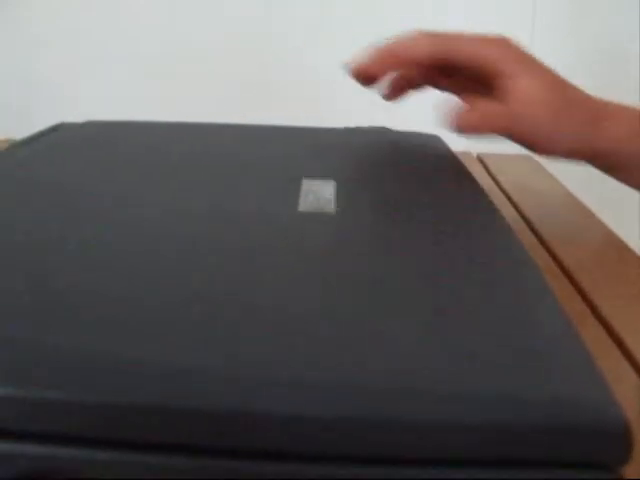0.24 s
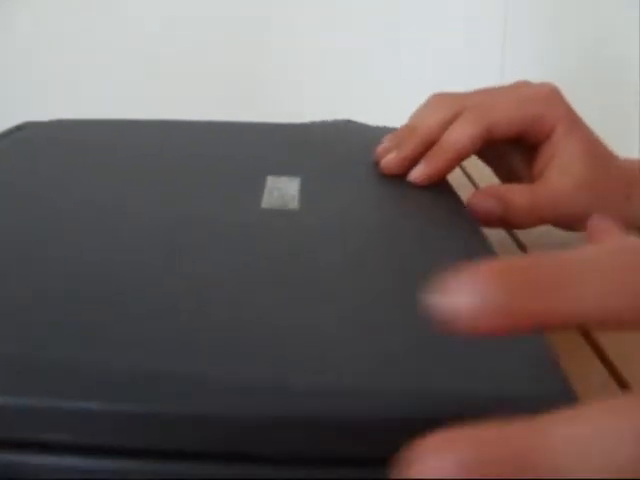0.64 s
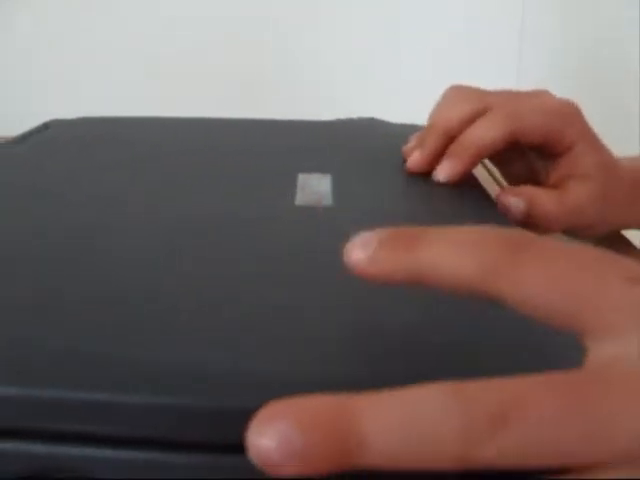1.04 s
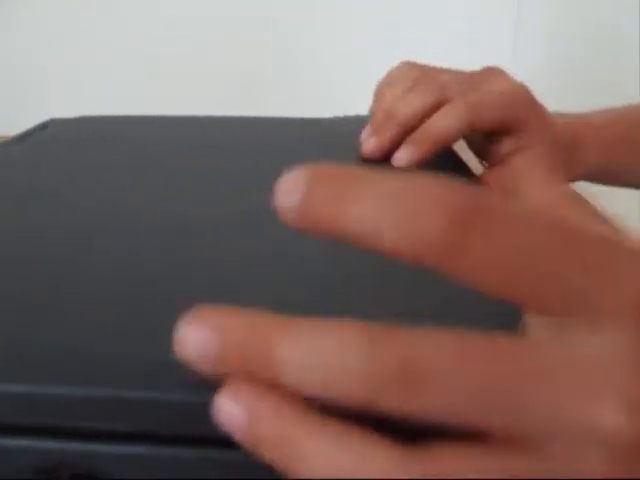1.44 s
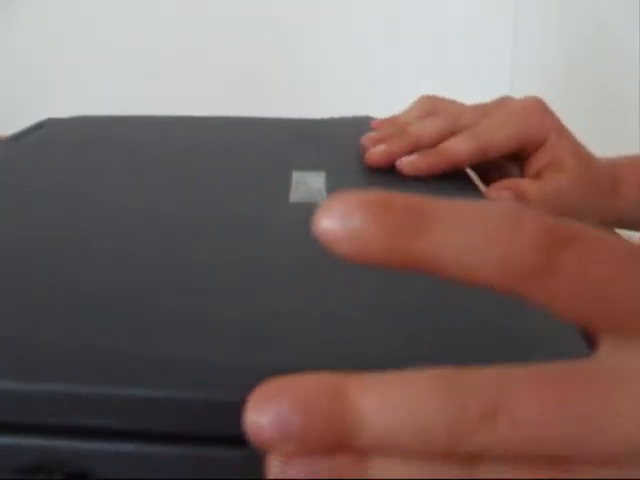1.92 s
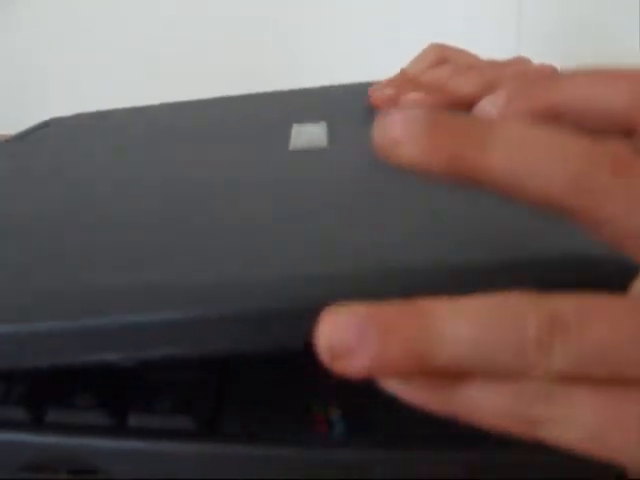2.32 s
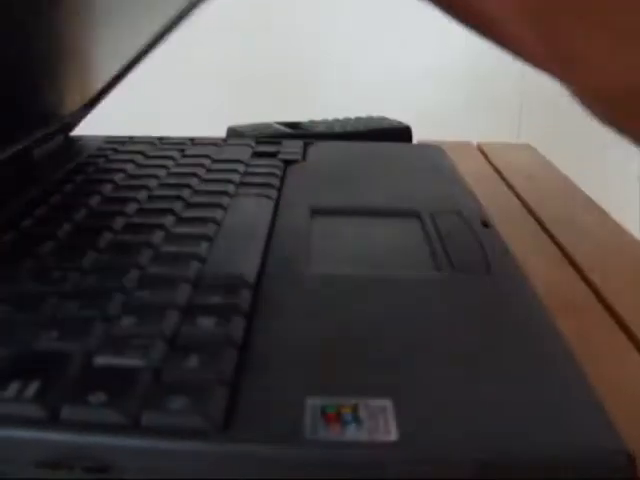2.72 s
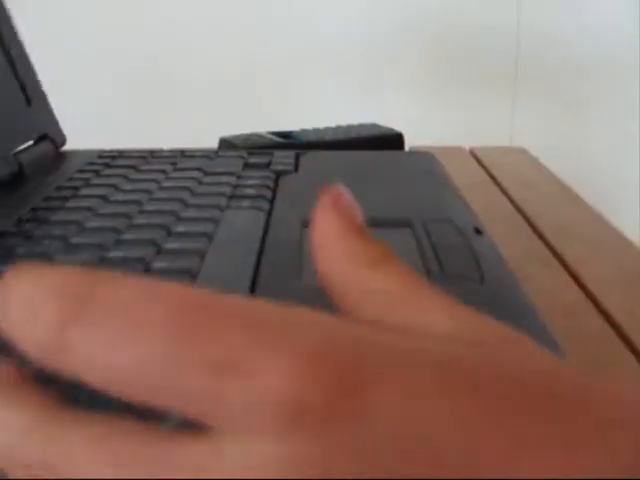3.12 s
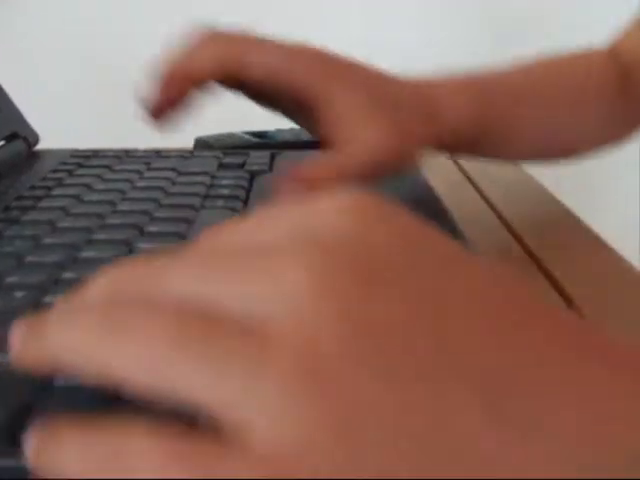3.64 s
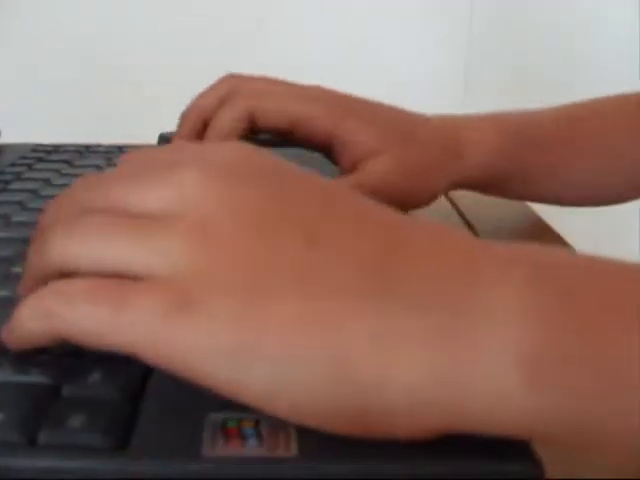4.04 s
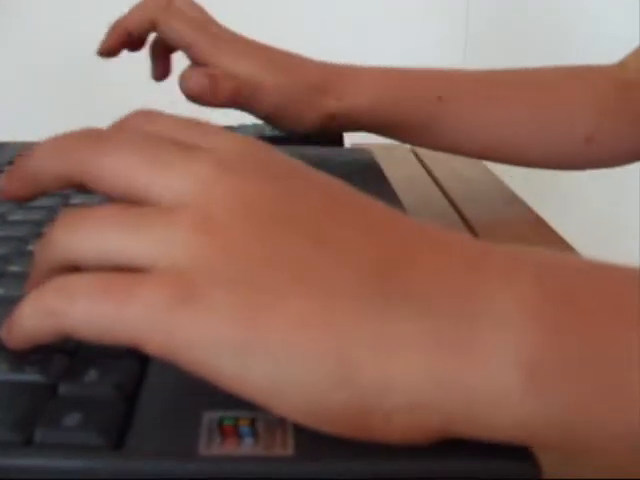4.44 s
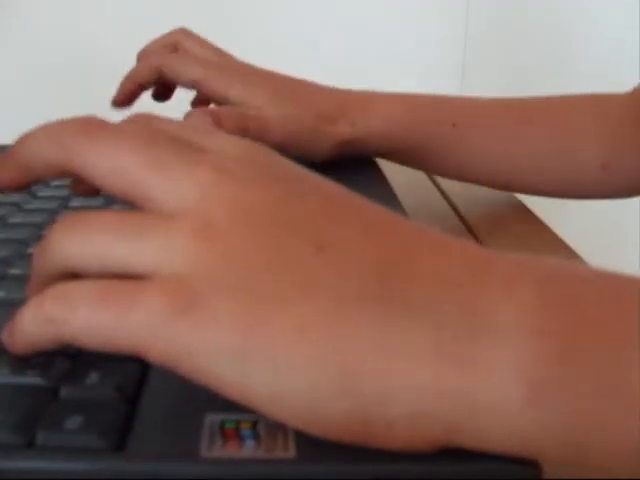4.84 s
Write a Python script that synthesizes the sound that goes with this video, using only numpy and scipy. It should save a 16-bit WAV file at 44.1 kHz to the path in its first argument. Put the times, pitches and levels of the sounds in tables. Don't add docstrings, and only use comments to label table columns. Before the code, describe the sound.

Close view of an old laptop on a wooden desk, in mono with soft hiss. A harsh two-part plastic crack opens, its echo fading over most of a second. Sparse fingertip ticks and brief skin rubs follow, with a sharp latch snap, quieter opening clicks, a pair of firmer taps after three seconds, then two separate key clicks. Occasional muffled knocks arrive from far away.

```python
import sys
import numpy as np
from scipy import signal
from scipy.fft import rfft, irfft, next_fast_len
from scipy.io import wavfile
from scipy.ndimage import uniform_filter1d, map_coordinates

SR = 44100
rng = np.random.default_rng(int(sys.argv[2]) if len(sys.argv) > 2 else 0)


def output_pcm(signal):
    pcm = np.clip(np.atleast_2d(signal).T, -1, 1) * 32767
    wavfile.write(sys.argv[1], SR, np.round(pcm).astype(np.int16))


def gain_from_db(level_db):
    decades = np.asarray(level_db, float) / 20
    return 10 ** decades


N = 224184

# pitch_hz, t60_s (time to fall 60 dB)
ROOM_RINGING = [(150, 0.55), (600, 0.88), (1200, 0.8), (3000, 1), (7500, 0.96)]

# pitch_hz, level_db
HISS_TONE = [(12, -53), (20, -5.5), (27, -6), (97, -13), (305, -9), (329, -10.5), (444, -10.5), (543, -9),
             (830, -9.5), (1070, -12), (1270, -11.5), (1940, -13), (7880, -16), (10200, -23), (17300, -120)]
HISS_DB = -49
HUM_HZ, HUM_WIDTH_HZ, HUM_DB = 100.6, 12.5, -63.5
OFFSET = -0.0034
TOP_HZ = 8010

# start_s, peak_db, centre_hz
KNOCKS = [
    (0.444, -27.5, 759),
    (0.485, -32.5, 795),
    (1.665, -28.5, 1250),
    (2.938, -19.5, 1470),
    (4.235, -25.5, 1490),
]
# pitch_hz, level_db
WALL_TONE = [(59, -43.5), (100, -13.5), (218, -11), (550, -5), (901, -0.5), (1180, -5.5), (1550, -8),
             (1680, -15.5), (2230, -18.5), (4500, -42), (5850, -70), (9900, -120)]
KNOCK_SWELL_S = 0.004

# start_s, strongest_s, end_s, level_db, brightness_db
RUBS = [(0.047, 0.041, 0.052, -30, 1.5), (.46, 0.496, 0.39, -42.5, -19.5), (1.177, 1.192, 1.235, -36.5, 2),
        (1.323, 1.339, 1.4, -39, -4), (1.882, 1.886, 1.905, -52.5, 12), (2.077, 2.097, 2.112, -48, 2),
        (2.449, 2.484, 2.7, -53, 7.5), (2.848, 2.859, 2.884, -42.5, 4), (3.464, 3.476, 3.6, -45.5, 1),
        (3.497, 3.524, 3.539, -43.5, -1), (4.707, 4.722, 4.745, -52.5, 10)]
# pitch_hz, width_hz, level_db
CASE = [(1700, 1060, 0), (4500, 3000, 6.5), (7250, 1500, 2.5)]
RUB_SWELL_DB, RUB_FADE_DB = 13, 15.5

# start_s, peak_db, ring_hz, t60_s
THUDS = [
    (0.0684, -16, 1241, 0.074),
    (0.429, -38, 101, 0.092),
    (0.48, -33.5, 2300, 0.024),
    (1.656, -42, 576, 0.045),
    (1.1845, -21.5, 6810, 0.033),
    (2.468, -40, 6660, 0.047),
    (2.914, -38.5, 98.5, 0.16),
    (3.222, -19, 1020, 0.014),
    (3.464, -33, 320, 0.02),
]
LATCH_S = 1.1885
# pitch_hz, level_db, t60_s
LATCH = [(81.5, -10, 0.0053), (366, -15, 0.0081), (653, -19, 0.012), (910, -14, 0.008), (1750, -13, 0.013),
         (6190, -8, 0.015)]
# start_s, peak_db, pitch_ratio
PRESSES = [
    (4.628, -30.5, 1.03),
    (5.077, -26, 1.34),
]
# pitch_hz, level_db, t60_s
DECK = [(212, -4.5, 0.068), (665, 1, 0.021), (1360, -7.5, 0.026)]

# start_s, peak_db, bright_ring_hz, body_db (re bright), body_ring_hz
SNAPS = [(0.9121, -14.5, 6250, -20.5, 1620), (1.188, -4.5, 4770, -9.5, 2490),
         (1.9209, -15.5, 6400, -20.5, 1200), (2.4892, -18.5, 6270, -5, 2810),
         (2.4909, -18.5, 6620, -6.5, 1490), (2.7053, -27.5, 5170, -0.5, 3040),
         (3.2211, -15, 3600, -8, 2250), (3.2246, -17, 4500, -6, 1750), (3.3958, -24.5, 3600, -1, 2740),
         (3.462, -26.5, 3970, -5, 2010), (3.6368, -29.5, 6950, -6.5, 1680),
         (4.6227, -17.5, 7250, -16.5, 1710), (4.626, -18.5, 5450, -18, 2010),
         (5.0735, -10.5, 5800, -8, 1750)]
SNAP_T60_S, LATCH_T60_S = 0.023, 0.015
REBOUND_S, REBOUND_DB, REBOUND_T60_S = 0.0056, -18, 0.026
REBOUND_HZ, REBOUND_BODY_DB = 5800, -4.5
FULL_BODY_DB = -14
ECHO_PURE_HZ, ECHO_PURE_DB = 650, 5
ECHO_BROAD_HZ, ECHO_BROAD_DB = 5500, 6
# start_s, peak_db, bright_ring_hz, body_db (re bright)
TOUCHES = [(0.481, -44, 3500, 12.5), (0.7236, -41, 7430, -5), (0.7924, -39.5, 4300, -4),
           (0.9524, -38, 6350, -16), (1.036, -40, 5160, -2.5), (1.3384, -30.5, 5100, -17),
           (1.3648, -41.5, 4800, -7.5), (1.461, -33.5, 4440, -8), (1.4879, -43.5, 5300, 3.5),
           (1.8796, -41.5, 6700, -1.5), (2.0041, -44, 5600, 1), (2.2508, -35, 6840, -11),
           (2.3504, -37.5, 6210, -2), (2.3784, -48.5, 5800, 7), (2.4122, -38, 5700, -13),
           (2.5206, -37.5, 3480, 0), (2.7794, -37.5, 6800, -7), (2.8664, -29.5, 3550, -5.5),
           (3.5103, -34.5, 4300, -17), (4.0214, -43.5, 6600, -22), (4.273, -42, 6500, -15),
           (2.733, -41, 6800, -15), (4.695, -38, 7170, -26), (4.72, -39, 5900, -9)]
TOUCH_BODY_HZ, TOUCH_T60_S = 1800, 0.019

# start_s, peak_db, thump_db (re peak), crack_t60_s
CLACK = [
    (0.053, 0, -17, 0.023),
    (0.066, 5.5, -29, 0.021),
]
# pitch_hz, level_db, t60_s
SHELL = [(690, -19.5, 0.29), (1221, 1, 0.069), (2300, 0, 0.068), (2940, -27, 0.11), (3500, -12, 0.077),
         (4170, -28, 0.37), (5082, -5.5, 0.083), (5800, 15.5, 0.087)]
# pitch_hz, level_db
CRACK_TONE = [(180, -68), (300, -22), (792, 3.5), (1190, -3), (2180, 4.5), (5090, -8), (5750, -7.5),
              (7880, -13.5), (10200, -59.5), (17300, -120)]
# pitch_hz, level_db
CLACK_ROOM_TONE = [(35, -77), (60, -49), (87, -13), (200, -1.5), (354, -9), (533, -21.5), (640, -8.5),
                   (724, -17.5), (1260, -4), (1710, -12.5), (2090, -5), (5800, -15.5), (7880, -22.5),
                   (10200, -64), (17300, -120)]
# pitch_hz, width_hz, level_db
CLACK_BANDS = [(630, 23, -12), (1240, 61, -2.5), (2024, 180, -0.5), (2630, 140, -2.5), (2910, 95, 0),
               (3260, 82, -5.5), (3470, 54, -2.5), (4300, 57, -9)]


def unit(x):
    return x / np.sqrt(np.mean(x ** 2) + 1e-20)


def peak(x):
    return x / np.abs(x).max()


def energy_one(x):
    return x / np.linalg.norm(x)


def along(points, hz):
    f, v = np.transpose(points)
    return np.interp(np.log(hz + 1), np.log(f + 1), v)


def filtered(x, response):
    m = next_fast_len(len(x) + 8192)
    hz = np.fft.rfftfreq(m, 1 / SR)
    return irfft(rfft(x, m) * response(hz), m)[:len(x)]


def rings(modes):
    def response(f):
        total = 0
        for k, (centre, width, db) in enumerate(modes):
            damping = 1j * f * width
            total = total + (-1) ** k * gain_from_db(db) * damping / (centre * centre - f * f + damping)
        return total
    return response


def twice(response):
    return lambda f: response(f) ** 2


def colour(tone):
    return lambda hz: gain_from_db(along(tone, hz))


def add(track, s, sound):
    part = track[round(s * SR):][:len(sound)]
    part += sound[:len(part)]


def tail(build_s, stretch=0.82):
    hz, t, z = signal.stft(rng.standard_normal(SR), SR, nperseg=256)
    t60 = stretch * along(ROOM_RINGING, hz)[:, None]
    decay = signal.istft(z * gain_from_db(-60 * t / t60), SR, nperseg=256)[1][:SR]
    swell = 1 - np.exp(-(np.arange(SR) / SR / build_s) ** 2.3)
    return energy_one(decay * swell)


def rattle(t60, snap, size=2600):
    t = np.arange(size) / SR
    lumps = rng.standard_normal(size // 30 + 4)
    lumps_db = 1.8 * map_coordinates(lumps, [np.arange(size) / 30], order=1)
    fade = gain_from_db(lumps_db - 60 * t / max(t60, 0.002)) * (1 - np.exp(-t / 0.00083))
    first = snap * np.exp(-((t - 0.0007) / 0.00004) ** 2)
    return rng.standard_normal(size) * fade + first


def floor():
    hiss = unit(filtered(rng.standard_normal(N), colour(HISS_TONE)))
    hum = unit(filtered(rng.standard_normal(N), rings([(HUM_HZ, HUM_WIDTH_HZ, 0)])))
    return gain_from_db(HISS_DB) * hiss + gain_from_db(HUM_DB) * hum


def knocks():
    out = np.zeros(N)
    for s, db, hz in KNOCKS:
        def walls(f):
            return colour(WALL_TONE)(f) * (1.86 + rings([(hz, 300, 0), (850, 200, -3)])(f))
        wet = filtered(tail(build_s=0.011, stretch=1.0), walls)
        add(out, s - 0.003, gain_from_db(db + 21.5) * energy_one(wet))
        blow = rattle(0.14, snap=0.3)
        blow = blow * (1 - np.exp(-np.arange(len(blow)) / SR / KNOCK_SWELL_S))
        add(out, s - 0.0035, gain_from_db(db - 2.0) * peak(filtered(blow, walls)))
    return out


def rubs():
    out, time = np.zeros(N), np.arange(N) / SR
    noise = rng.standard_normal(N)
    grip = unit(uniform_filter1d(rng.standard_normal(N), 120))
    grains = noise * gain_from_db(4 * grip)
    dull = unit(filtered(grains[::-1], rings(CASE[:1])))
    bright = unit(filtered(grains, rings(CASE[1:])))
    for start, top, end, db, bright_db in RUBS:
        edge = np.clip(np.minimum(time - start, end - time) / 0.0019, 0, 1)
        stroke_db = np.interp(time, [start, top, end], [db - RUB_SWELL_DB, db, db - RUB_FADE_DB])
        out += edge * gain_from_db(stroke_db - 0.5) * (dull + gain_from_db(bright_db) * bright)
    return out


def thuds():
    out, t = np.zeros(N), np.arange(SR // 4) / SR
    strikes = THUDS + [(LATCH_S, db, hz, t60) for hz, db, t60 in LATCH]
    for s, db, ratio in PRESSES:
        strikes += [(s, db + level, ratio * hz, t60) for hz, level, t60 in DECK]
    for s, db, hz, t60 in strikes:
        onset = 1 - np.exp(-t * hz * 3)
        add(out, s, gain_from_db(db - 60 * t / t60) * onset * np.sin(2 * np.pi * hz * t))
    return out


def contact(db, hz, body_db, body_hz, t60):
    ring = peak(filtered(rattle(t60, snap=10.0), twice(rings([(hz, 950, 0)]))))
    spray = peak(filtered(rattle(t60, snap=0.87), twice(rings([(5680, 5100, 0)]))))
    body = peak(filtered(rattle(t60, snap=2.55), rings([(body_hz, 700, 0), (2200, 2200, -8)])))
    late_body = np.roll(body, round(0.000986 * SR))
    return gain_from_db(db + 2.5) * (ring + gain_from_db(-2.5) * spray + gain_from_db(body_db + 1.0) * late_body)


def ticks():
    out = np.zeros(N)
    contacts = [(*touch, TOUCH_BODY_HZ, TOUCH_T60_S) for touch in TOUCHES]
    for s, db, hz, body_db, body_hz in SNAPS:
        t60 = LATCH_T60_S if abs(s - LATCH_S) < REBOUND_S else SNAP_T60_S
        contacts.append((s, db, hz, body_db, body_hz, t60))
        contacts.append((s + REBOUND_S, db + REBOUND_DB, REBOUND_HZ, REBOUND_BODY_DB, body_hz, REBOUND_T60_S))
    for s, *settings in contacts:
        add(out, s - 0.0003, contact(*settings))
    for s, db, hz, body_db, _ in SNAPS:
        width, echo_db = ECHO_PURE_HZ, ECHO_PURE_DB
        if body_db > FULL_BODY_DB:
            width, echo_db = ECHO_BROAD_HZ, ECHO_BROAD_DB
        wet = filtered(tail(build_s=0.018, stretch=0.88), twice(rings([(hz, 2.7 * width, 0)])))
        add(out, s, gain_from_db(db + echo_db) * energy_one(wet))
    return out


def clack_room(f):
    bands = sum(np.abs(rings([band])(f)) ** 2 for band in CLACK_BANDS)
    return colour(CLACK_ROOM_TONE)(f) * (0.89 + bands)


def clack():
    out, t = np.zeros(N), np.arange(SR // 4) / SR
    for (s, db, thump_db, crack_t60), ring_db in zip(CLACK, (-14, -2.5)):
        ring = 0
        for hz, level, t60 in SHELL:
            t60 = min(t60, 90000 / hz ** 2)
            ring = ring + gain_from_db(level - 60 * t / t60) * np.sin(2 * np.pi * hz * t)
        add(out, s + 0.00059, gain_from_db(db + ring_db) * peak(ring))
        crack = filtered(rattle(crack_t60, snap=1.76), colour(CRACK_TONE))
        add(out, s + 0.00033, gain_from_db(db - 1.0) * peak(crack))
        thump = gain_from_db(-60 * t / 0.076) * (1 - np.exp(-t / 0.0026)) * np.sin(2 * np.pi * 205 * t)
        add(out, s, gain_from_db(db + thump_db + 4.0) * thump)
    landing_s, snap_s = CLACK[0][0], CLACK[1][0]
    far_walls = filtered(tail(build_s=0.037), clack_room)
    add(out, snap_s, gain_from_db(13.5) * energy_one(far_walls))
    near_desk = filtered(tail(build_s=0.0035, stretch=0.47), colour(CLACK_ROOM_TONE))
    add(out, landing_s, gain_from_db(9) * energy_one(near_desk))
    return out


def scene():
    mono = floor() + knocks() + rubs() + thuds() + ticks() + clack()
    return np.array([mono, mono])


def low_pass(x):
    return signal.sosfilt(signal.butter(12, 8030, fs=SR, output="sos"), x)


def record(dry):
    narrow = filtered(dry[0], lambda hz: 1 / (1 + (hz / TOP_HZ) ** 60))
    mono = np.clip(narrow + OFFSET, -1, 1)
    return low_pass(np.array([mono, mono]))


dry = scene()
out = record(dry)
output_pcm(out)
```